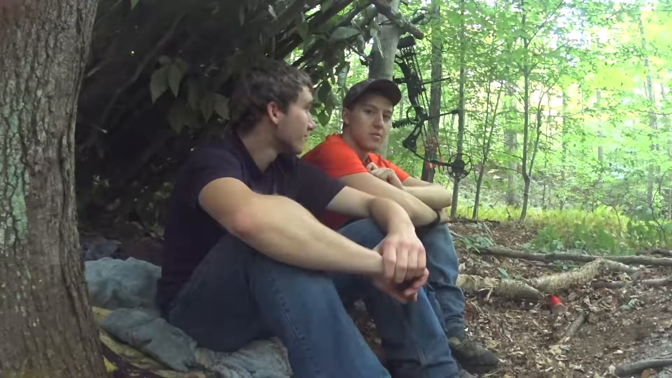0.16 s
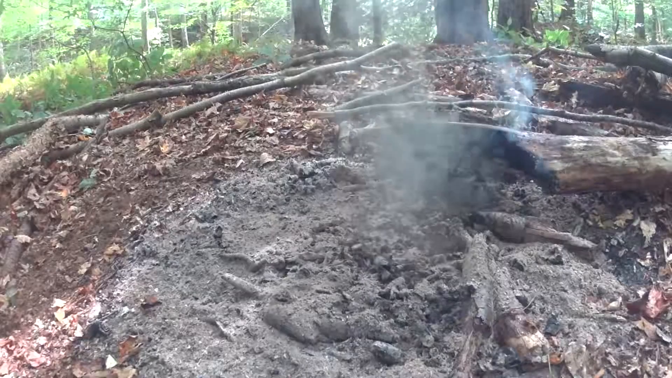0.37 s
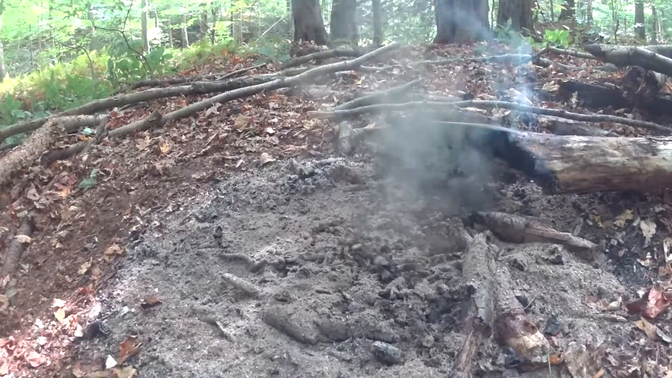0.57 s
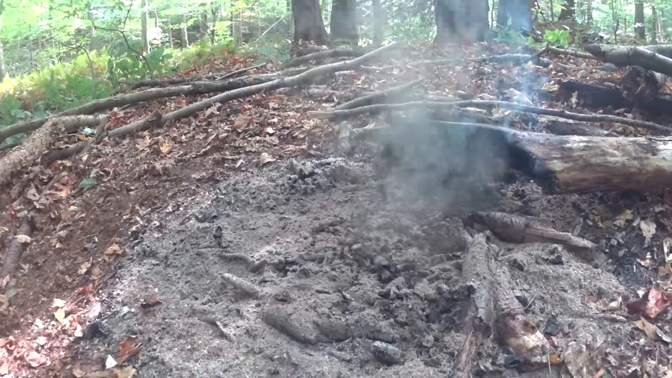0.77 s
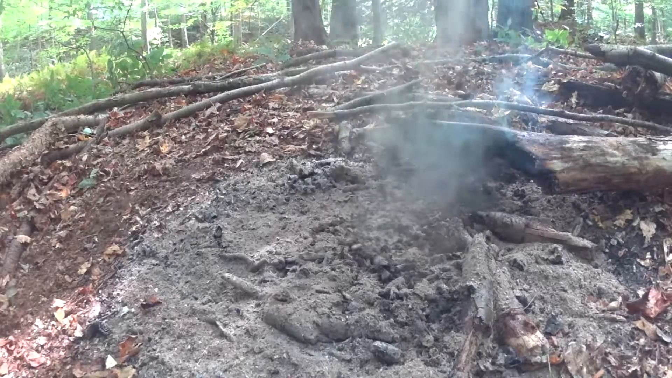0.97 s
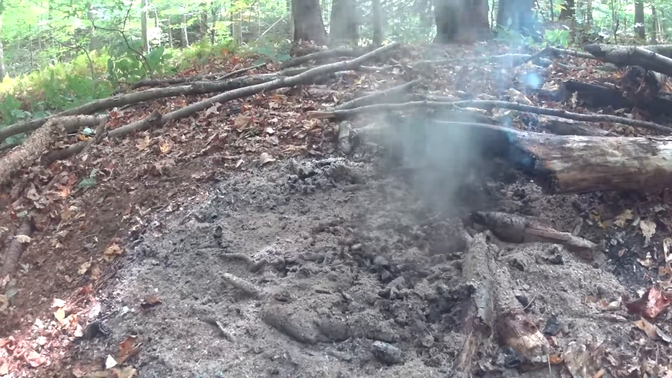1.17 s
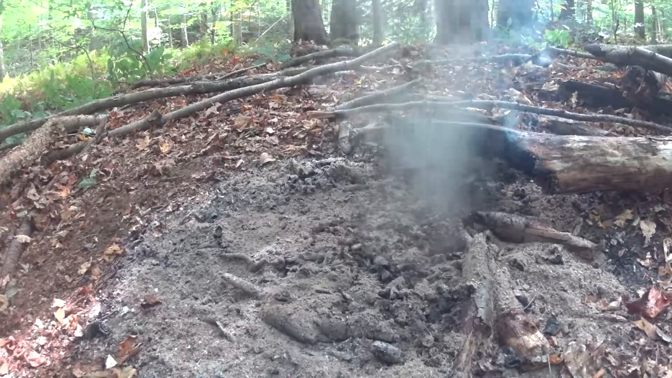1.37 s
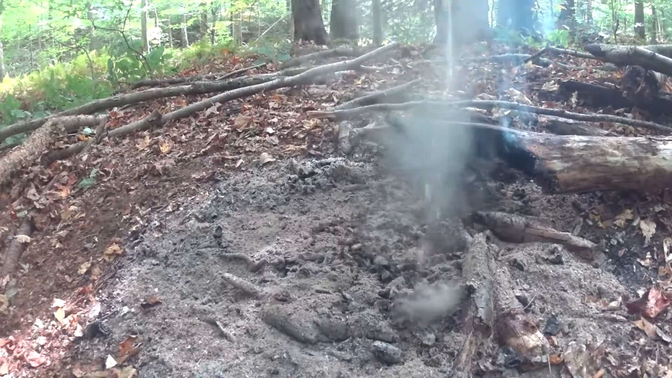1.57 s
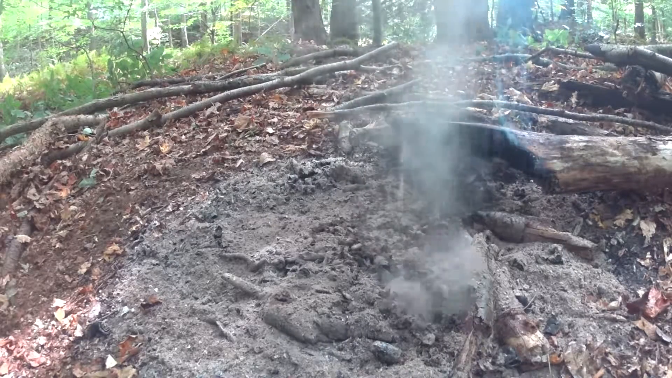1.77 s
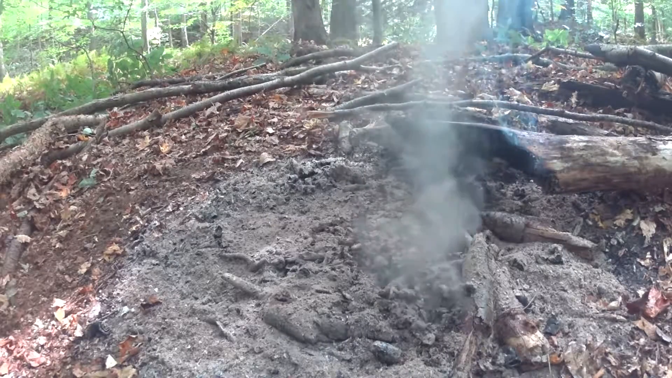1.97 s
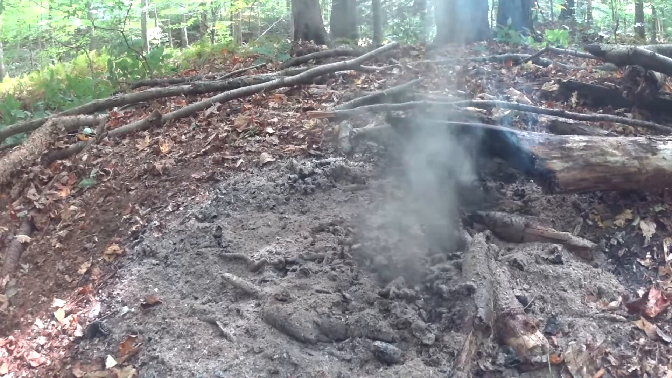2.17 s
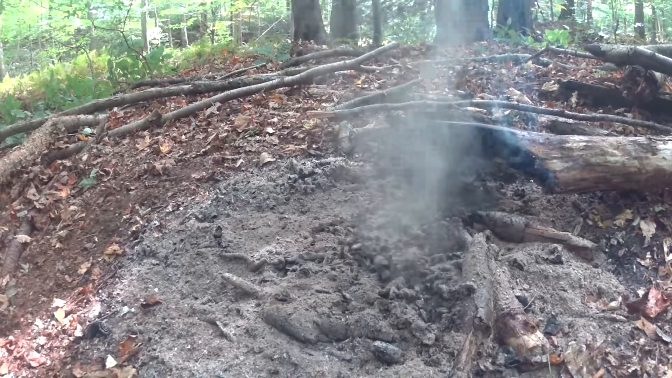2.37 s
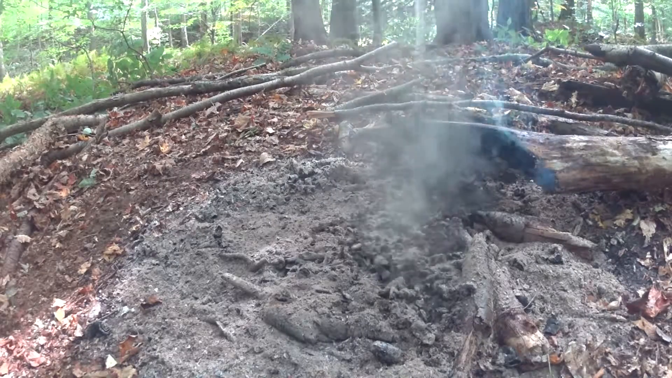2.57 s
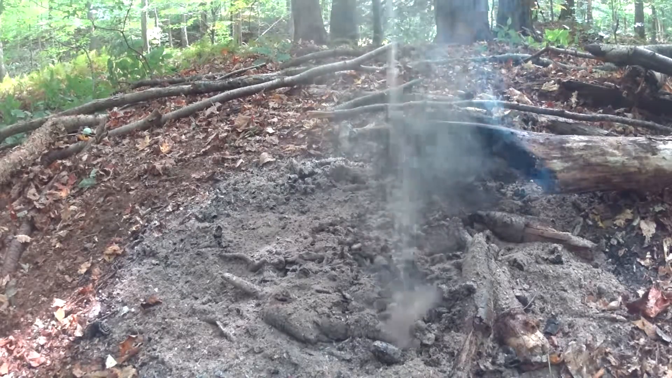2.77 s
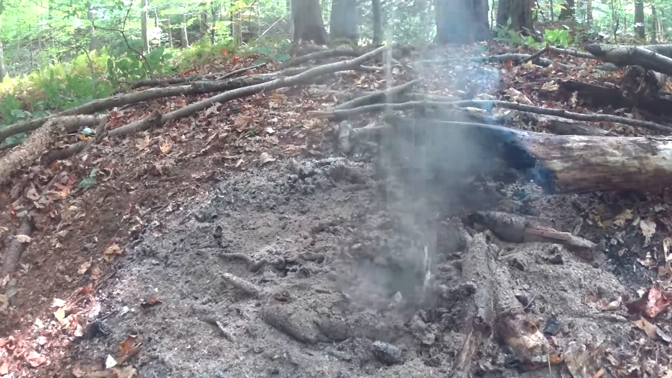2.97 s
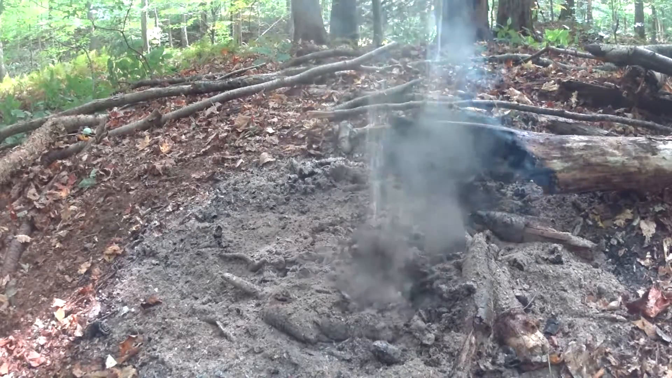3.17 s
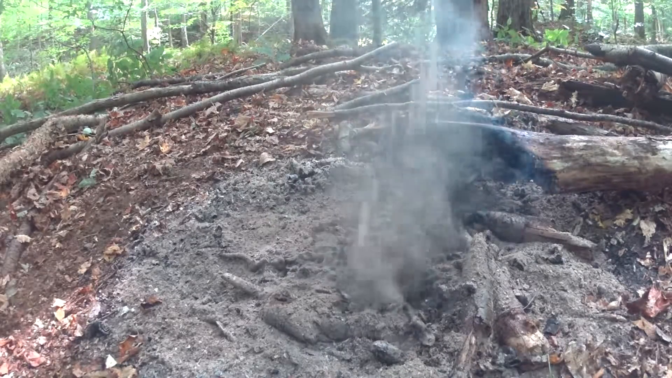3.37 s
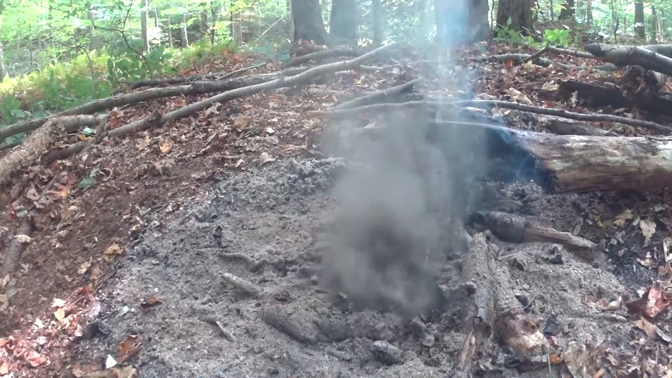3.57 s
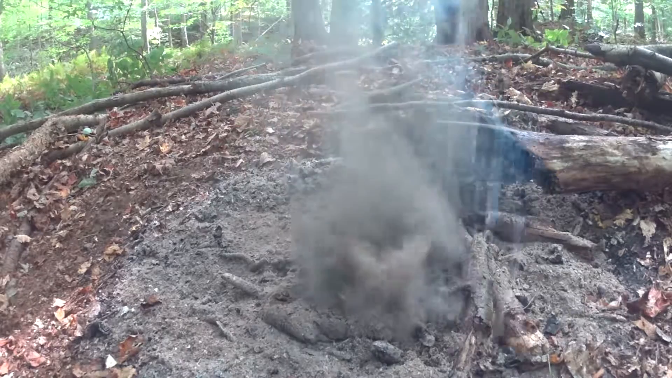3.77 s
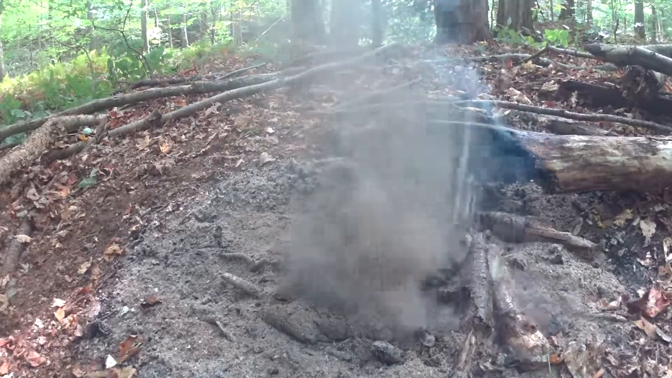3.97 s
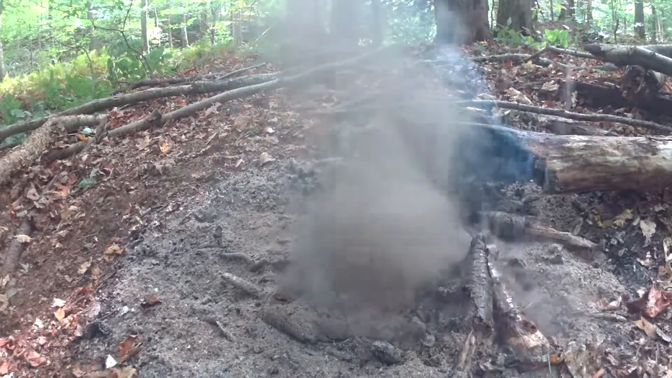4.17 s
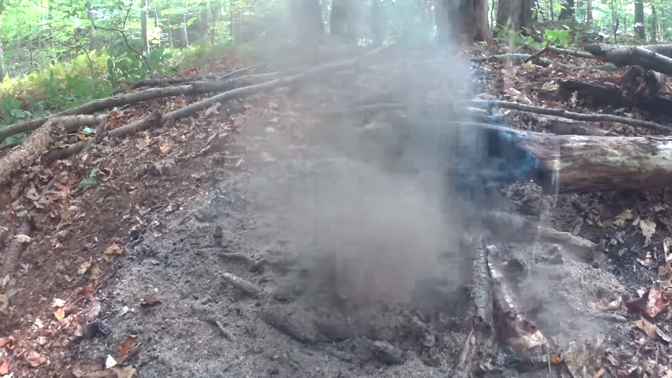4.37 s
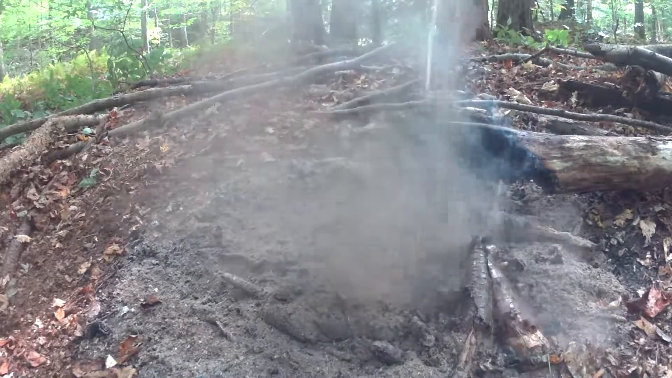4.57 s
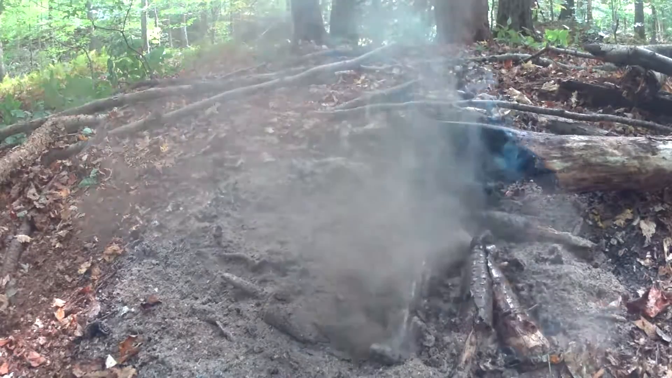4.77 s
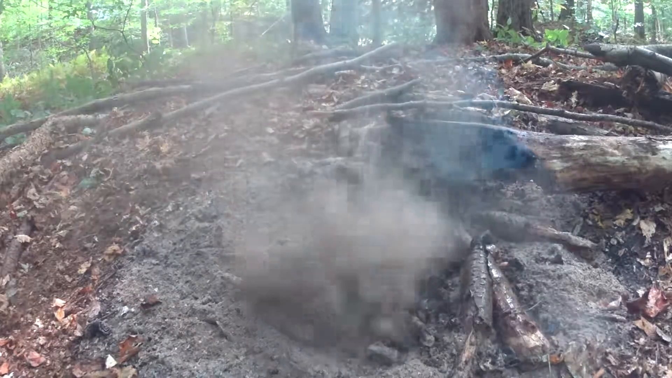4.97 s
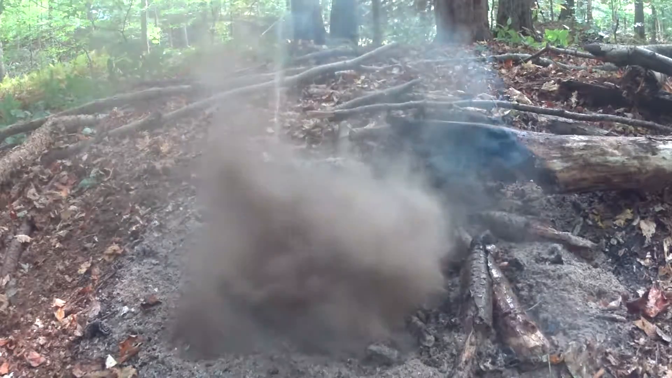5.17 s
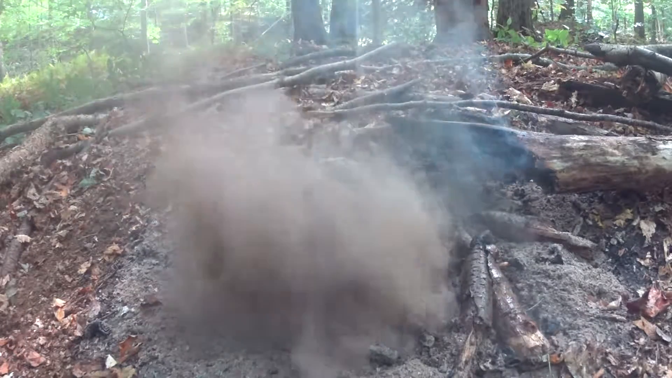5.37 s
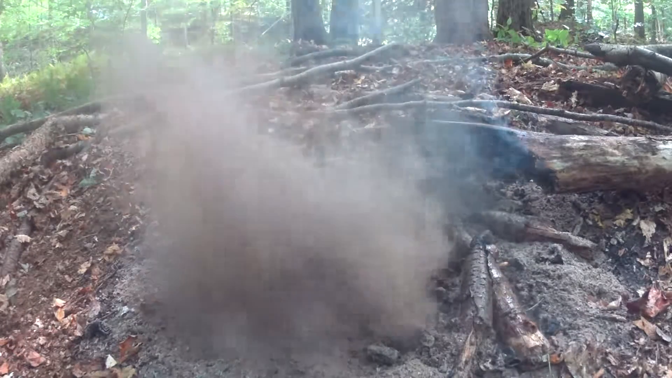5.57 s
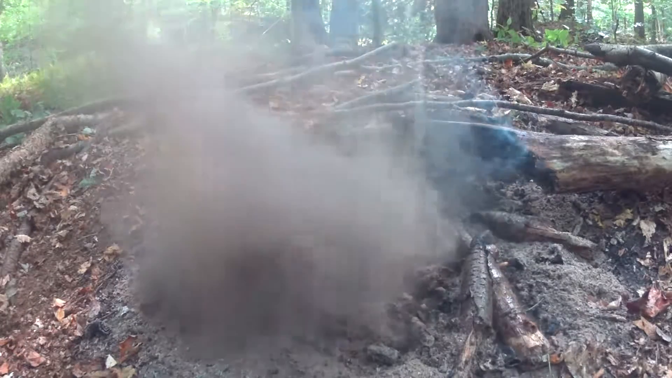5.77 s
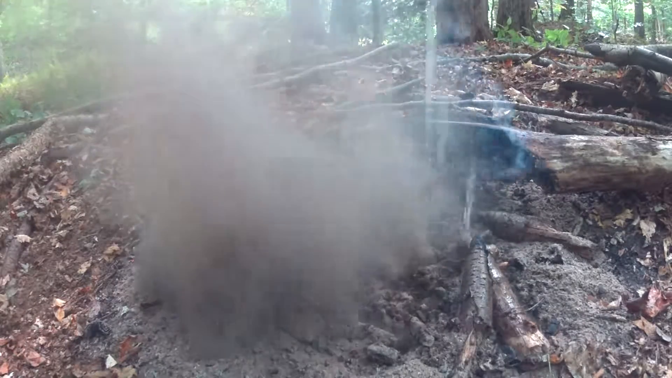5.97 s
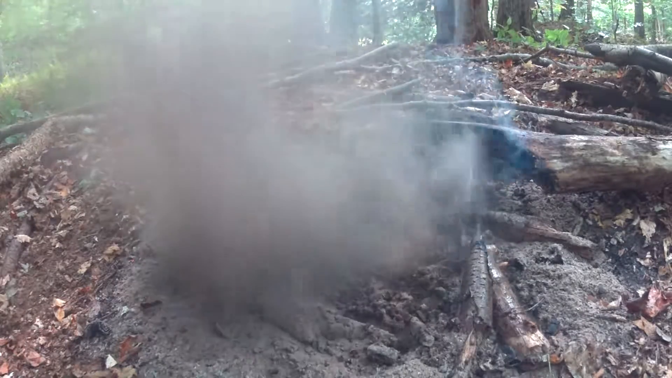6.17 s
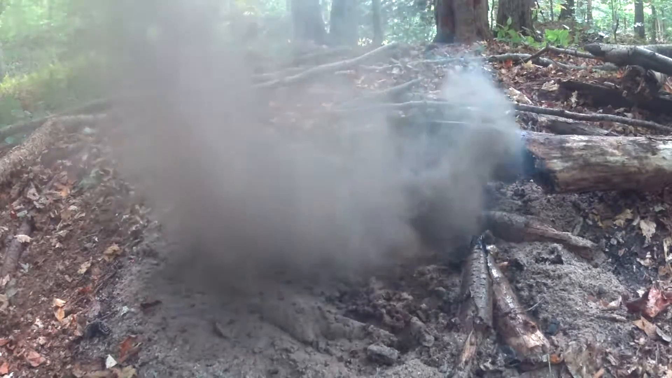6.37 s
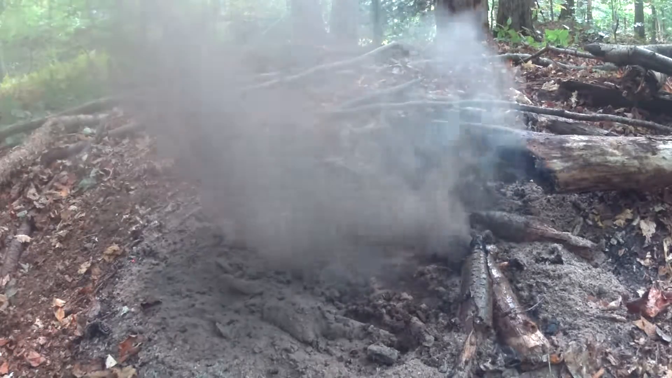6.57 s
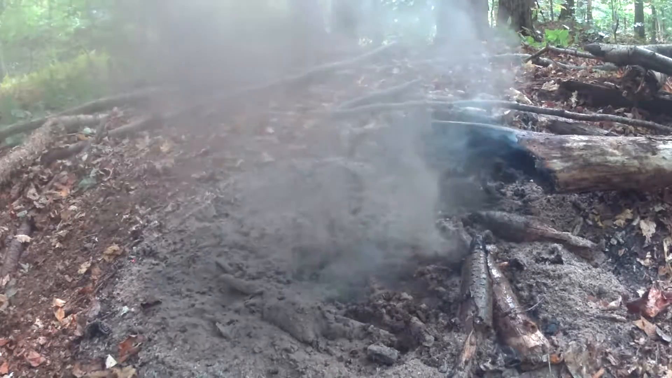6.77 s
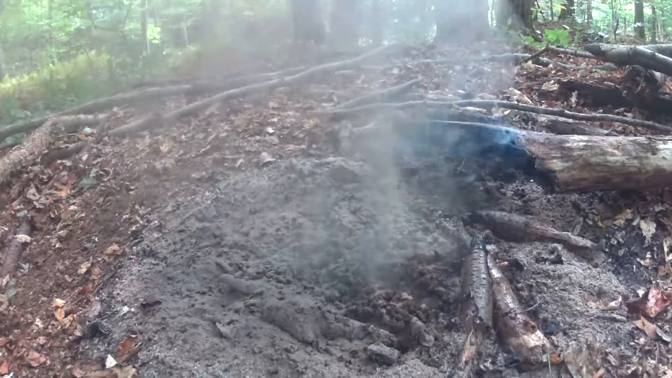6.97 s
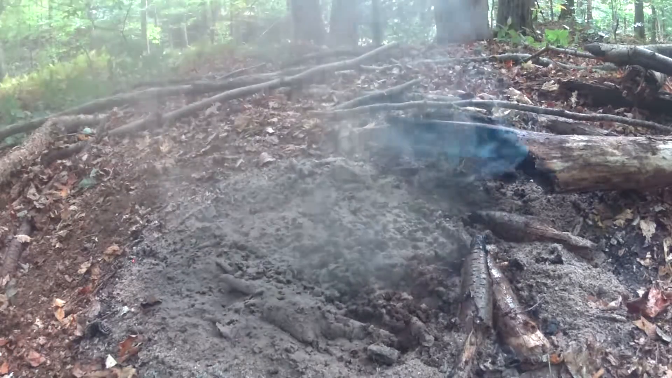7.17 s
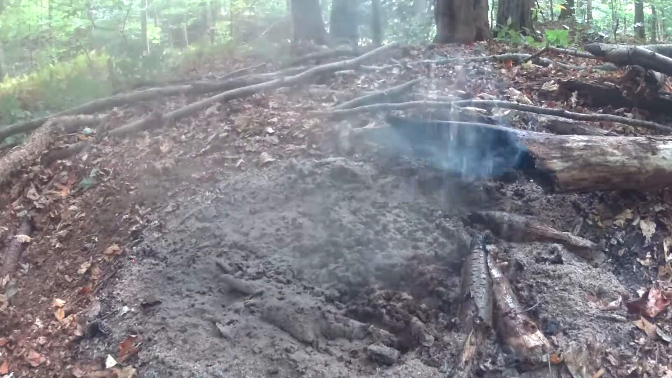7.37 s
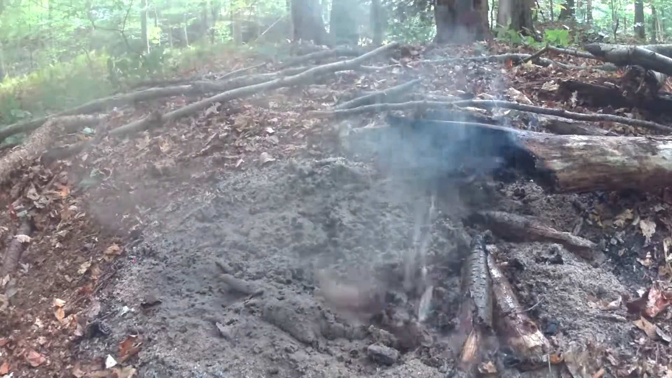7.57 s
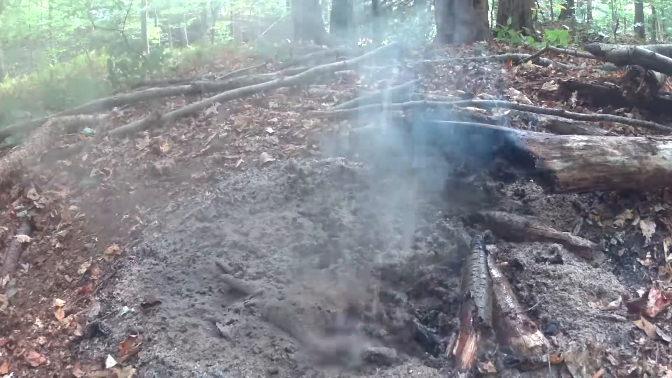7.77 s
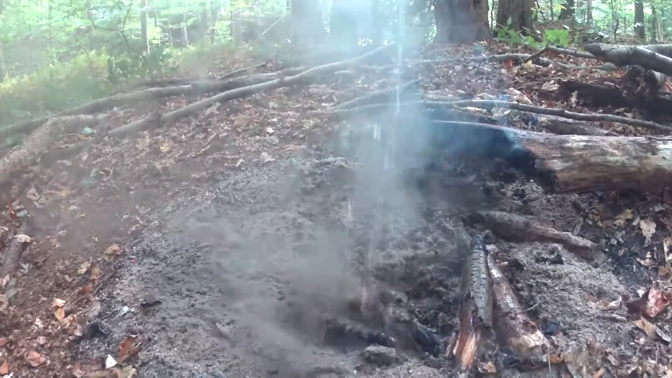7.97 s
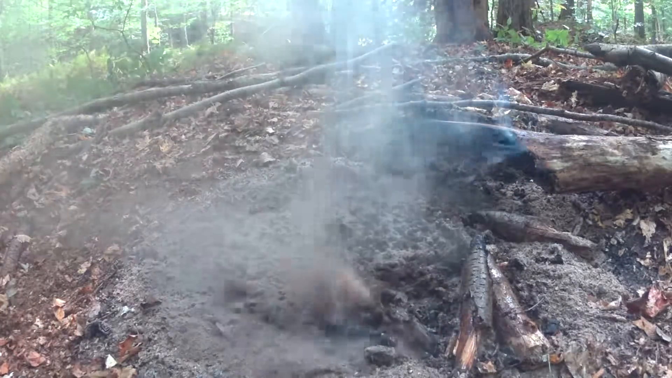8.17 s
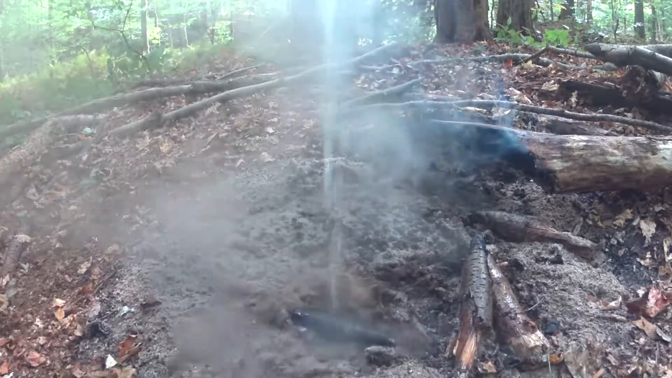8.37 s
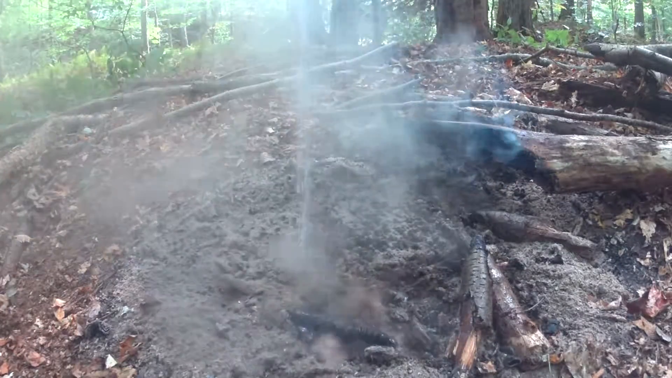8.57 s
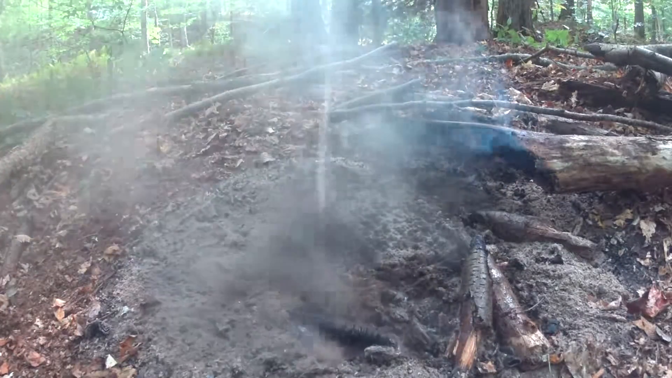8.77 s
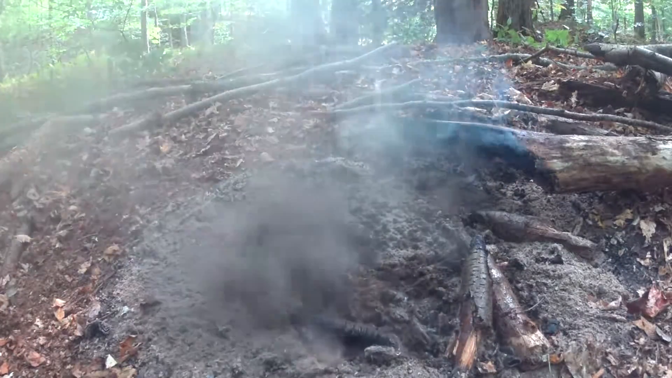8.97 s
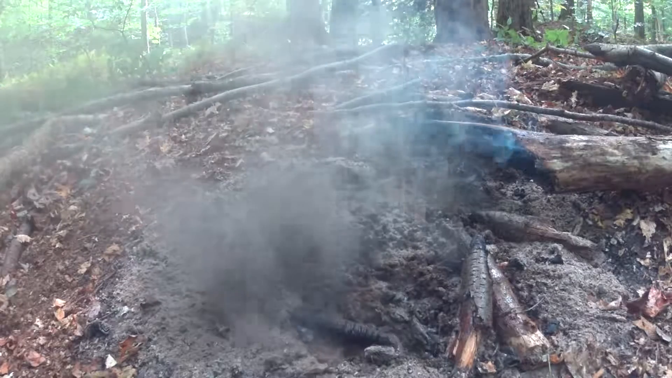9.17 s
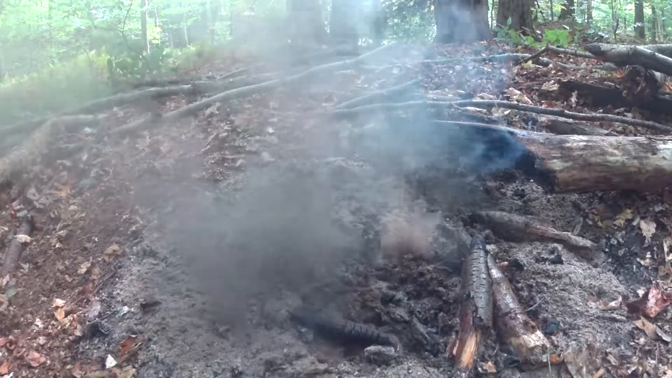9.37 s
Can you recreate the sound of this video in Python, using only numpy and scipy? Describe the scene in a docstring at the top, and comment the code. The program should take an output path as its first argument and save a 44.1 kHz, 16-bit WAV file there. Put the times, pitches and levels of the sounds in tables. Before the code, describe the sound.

Close up in a quiet wood, poured water sizzles and crackles on hot ash, surging, easing off, then surging again.

```python
"""A jug pours water in gulps onto hot embers in a wood, heard close up; leaves, air and a hum stay faint behind.
First the jug glugs low as air enters; from about 0.6 s single drops snap on the ash and a few short
gushes splatter, with more of them from 1.5 s, when water also thuds. From 2.7 to 6.2 s the pour is strong,
with steam hiss (flickering noise), snaps (short ticks) and popping wet pockets (fading tones).
After a quieter second a new gush starts near 7.4 s, swells past 8 s and weakens towards the end."""
import sys
import numpy as np
from scipy import signal
from scipy.io import wavfile
from scipy.ndimage import uniform_filter1d

SR = 44100
rng = np.random.default_rng(int(sys.argv[2]) if len(sys.argv) > 2 else 0)


def pcm_store(signal):
    """Save signal as 16-bit PCM."""
    levels = np.round(np.clip(np.atleast_2d(signal), -1, 1) * 32767)
    wavfile.write(sys.argv[1], SR, levels.astype(np.int16).T)


N = 416304  # length in samples

# How strong the pour is, between gushes:
# t/s, steam level/dB, steam treble level/dB, water level/dB, low rumble level/dB
POUR = [(0, -56, -67, -57.5, -61), (0.7, -57.5, -59, -59, -65), (0.95, -52.5, -57, -56.5, -62),
        (1.3, -58.5, -72, -63, -68), (1.47, -62.5, -66, -64.5, -68), (1.49, -48.5, -46, -43, -50),
        (1.75, -53, -45.5, -55.5, -55.5), (2.2, -58, -49.5, -61.5, -69), (2.645, -62, -65, -66.5, -67.5),
        (2.66, -45.5, -42.5, -54, -56), (3.2, -42.5, -50, -49.5, -53), (3.65, -39.5, -34, -43, -47),
        (4.15, -43, -36, -46, -48.5), (4.45, -46, -46, -48.5, -50), (4.7, -38.5, -26, -37, -44.5),
        (4.83, -41, -40, -49, -49), (5.05, -34.5, -29.5, -37, -44), (5.65, -47, -43, -47, -49.5),
        (6.2, -45, -41, -49, -53.5), (6.55, -50.5, -46, -59.5, -69.5), (7.38, -58.5, -63, -60, -66),
        (7.46, -45, -38.5, -51, -53.5), (7.7, -48.5, -43.5, -47, -49.5), (8.2, -36, -34, -45.5, -51),
        (8.5, -37.5, -32, -40, -48.5), (8.9, -42, -38, -46.5, -50.5), (9.44, -46, -40, -55.5, -64.5)]
# Tone colour of hissing steam: f/Hz, level/dB (per Hz)
STEAM_COLOUR = [(1120, -24.5), (1900, -0.5), (2020, -5.5), (3110, 2.5), (3450, -3.5), (3750, 0.5),
                (4900, -4), (6180, 1.5), (7010, -5), (8500, -7), (9310, 2.5), (9810, 5.5), (10600, 1.5),
                (11300, 2.5)]
# Tone colour of splashing water: f/Hz, level/dB (per Hz)
SPLASH_COLOUR = [(260, -35.5), (450, -4.5), (944, -10), (1070, -9.5), (1220, 4), (1510, -7), (1740, 0),
                 (1990, -20.5), (2100, -2.5), (2900, -9.5), (7000, -34)]
# Tone colour of the low rumble, with jug resonances near 92, 162 and 285 Hz: f/Hz, level/dB (per Hz)
RUMBLE_COLOUR = [(50, -19.5), (78, -15), (92, 3), (108, -7), (140, -10), (162, 0.5), (190, 0), (250, -5.5),
                 (285, -2), (330, -4.5), (460, -15), (700, -60.5)]


def gain_of(db):
    """Turn decibels into a factor for the sound pressure."""
    return 10 ** (np.asarray(db) / 20)


def evened(x):
    """Bring a sound to an rms of 1, so that a level can be set afterwards."""
    return x / np.sqrt(np.mean(x ** 2) + 1e-20)


def read(points, hz):
    """Read a curve at any pitch, in straight lines over log frequency."""
    f, value = np.transpose(points)
    return np.interp(np.log(hz + 1), np.log(f + 1), value)


def add(mix, s, sound):
    """Lay a short sound into the mix at s seconds."""
    part = mix[round(s * SR):][:len(sound)]
    part += sound[:len(part)]


def control(table, column):
    """Read one column of a time curve at every sample."""
    columns = np.transpose(table)
    return np.interp(np.arange(N) / SR, columns[0], columns[column])


def highpass(x, order, hz):
    """Weaken everything below hz."""
    return signal.sosfilt(signal.butter(order, hz, "high", fs=SR, output="sos"), x)


def colour(x, points):
    """Filter that never rings ahead of the sound; white noise of rms 1 stays near rms 1."""
    hz = abs(np.fft.fftfreq(8192, 1 / SR))
    log_gain = np.log(gain_of(np.maximum(read(points, hz), -100)))
    # the Hilbert transform gives the phase that puts the energy as early as possible
    spectrum = np.exp(np.conj(signal.hilbert(log_gain)))
    taps = np.fft.ifft(spectrum).real[:4096]
    return signal.oaconvolve(x, taps / np.linalg.norm(taps))[:len(x)]


def patchy(patchy_db, flicker_db, span, depth=np.ones(N)):
    """White noise with random patches in time and pitch and a flicker shared by all pitches."""
    frames = N // 64 + 5  # one frame every 64 samples; span counts frames
    a, b, patches = rng.standard_normal((frames, 129, 3)).T
    patches = uniform_filter1d(patches, 8, 0)  # smooth over pitch
    patches = evened(uniform_filter1d(patches, span, 1))  # smooth over time
    flicker = evened(uniform_filter1d(rng.standard_normal(frames), span))
    level_db = np.resize(depth[::64], frames) * (patchy_db * patches + flicker_db * flicker)
    z = (a + 1j * b) * gain_of(level_db)
    return evened(signal.istft(z, nperseg=256, noverlap=192)[1][:N])


def grains(per_s, spread_db, low_hz, high_hz, turns, count=8):
    """Sparse short wavelets of many pitches that fade over a few turns or less; a few are large."""
    happens = rng.random(N) < per_s / SR
    size = gain_of(spread_db * np.minimum(rng.exponential(1, N), 4)) * happens
    kind = rng.integers(0, count, N)
    out = np.zeros(N)
    for k, hz in enumerate(np.geomspace(low_hz, high_hz, count)):
        u = np.arange(400) / SR * hz  # time counted in turns of the tone
        wavelet = np.sin(2 * np.pi * u) * np.exp(-u / turns) * (1 - np.exp(-u / 0.71))
        wavelet = wavelet / np.linalg.norm(wavelet) * np.sqrt(hz)
        out += signal.oaconvolve(size * (kind == k), wavelet)[:N]
    return evened(out)


def bubbles(table, rise_s, echo_s, echo_db, slap_db, slap_hz):
    """Ringing air pockets with a soft start, a dull slap of water and one echo off the ground."""
    out, t = np.zeros(N), np.arange(9000) / SR
    slaps = rng.standard_normal((len(table), 9000))
    slaps = evened(signal.lfilter(*signal.butter(2, slap_hz, fs=SR), slaps))
    for (s, db, hz, t60), slap in zip(table, slaps):
        ring = np.sin(2 * np.pi * hz * t) * (1 - np.exp(-t / rise_s))
        ring += slap * gain_of(slap_db - 60 * t / 0.094)  # the slap fades faster than the tone
        ring *= gain_of(db - 60 * t / t60)
        add(out, s, ring)
        add(out, s + echo_s, gain_of(echo_db) * ring)
    return out


def steam():
    """A fine hiss; sputter and flicker grow with the steam level, and the treble has its own level."""
    level_db = control(POUR, column=1)
    fierce = np.clip((level_db + 61.0) / 16, .1, 1)
    sputter = patchy(4.5, 5.0, span=4)
    hiss = patchy(1.9, 1.63, span=40, depth=fierce) + fierce * gain_of(-5.0) * sputter
    spits = grains(1500, 6.7, 1450, 10500, turns=0.18)
    hiss = colour(hiss + fierce * gain_of(-9.5) * spits, STEAM_COLOUR)
    dull = signal.sosfiltfilt(signal.butter(2, 7500, fs=SR, output="sos"), hiss)
    treble = hiss - dull
    return gain_of(level_db) * evened(dull) + gain_of(control(POUR, column=2)) * evened(treble)


def splash():
    """Water churns in the ash: lumpy noise and small bubbles."""
    lumps = patchy(3.05, 0.22, span=10)
    small_bubbles = grains(250, 0.75, 488, 2250, turns=3.0)
    churn = colour(lumps + gain_of(-26.0) * small_bubbles, SPLASH_COLOUR)
    return gain_of(control(POUR, column=3)) * evened(churn)


def rumble():
    """A low uneven rumble with resonances of the jug near 92, 162 and 285 Hz."""
    low_noise = colour(patchy(1.2, 2.2, span=24), RUMBLE_COLOUR)
    return gain_of(control(POUR, column=4)) * evened(low_noise)


def gushes():
    """Dense sputter under a quick swell; dull gushes sound deeper with some rumble, others fizz."""
    # Gushes that splatter over the embers: t/s, level/dB, length/s, dullness/0-1
    gush_rows = [(0.57, -35.5, 0.064, 0.21), (1.117, -45, 0.024, 0.2), (1.139, -36, 0.07, 0.29),
                 (1.47, -45.5, 0.034, 0.1), (1.658, -39.5, 0.023, 0), (1.773, -33, 0.06, 0.43),
                 (1.97, -50, 0.064, 0.14), (2.654, -40, 0.064, 0.55), (2.804, -34.5, 0.047, 0.2),
                 (2.905, -36, 0.061, 0.25), (3.026, -28, 0.035, 0.41), (3.257, -29.5, 0.012, 0.02),
                 (3.335, -27.5, 0.033, 0.31), (3.393, -28.5, 0.043, 0.74), (3.505, -26, 0.057, 0.19),
                 (3.428, -33, 0.06, 0.08), (3.654, -31, 0.02, 0.23), (3.685, -31.5, 0.051, 0.17),
                 (3.861, -33, 0.03, 0.7), (4.279, -24, 0.013, 0), (4.333, -31, 0.049, 0.6),
                 (4.476, -30.5, 0.065, 0.37), (4.588, -34, 0.061, 0), (4.64, -27.5, 0.06, 0.31),
                 (4.862, -25, 0.073, 0.4), (5.371, -31, 0.05, 0.64), (5.524, -24, 0.051, 0.74),
                 (5.709, -31.5, 0.036, 0.72), (5.754, -28, 0.054, 0.42), (6.06, -36.5, 0.068, 0.34),
                 (6.252, -32.5, 0.039, 0.26), (7.473, -25.5, 0.052, 0.25), (7.605, -33.5, 0.039, 0),
                 (7.715, -31, 0.075, 0.19), (7.837, -30, 0.0077, 0), (7.891, -27.5, 0.09, 0.16),
                 (8.12, -28, 0.043, 0.08), (8.389, -27, 0.046, 0.2), (8.582, -32.5, 0.078, 0.9),
                 (8.96, -30.5, 0.029, 0.67), (9.257, -33.5, 0.063, 0.53)]
    spurts_per_s, spurt_s, between_spurts_db = 200, .003, -1  # a gush spits in short spurts
    boom_db, hiss_db = -14, 0.5  # low rumble and hiss under a gush
    rise = 0.07  # as a share of the length

    deep = evened(colour(patchy(0.38, 2.1, span=3), SPLASH_COLOUR))
    deep += gain_of(boom_db) * evened(colour(rng.standard_normal(N), RUMBLE_COLOUR))
    fizz = evened(colour(grains(6000, 5.8, 1690, 7000, turns=0.58), STEAM_COLOUR))
    fizz = evened(fizz + gain_of(hiss_db) * colour(rng.standard_normal(N), STEAM_COLOUR))

    starts = rng.random(N) * (rng.random(N) < spurts_per_s / SR)
    spurts = evened(signal.lfilter([1], [1, -np.exp(-1 / (spurt_s * SR))], starts))
    spurts += gain_of(between_spurts_db)
    deep, fizz = evened(deep * np.sqrt(spurts)), evened(fizz * spurts)

    out = np.zeros(N)
    for s, db, length, dull in gush_rows:
        at = round(s * SR) + np.arange(round(2 * length * SR))
        u = np.linspace(0, 2, len(at))  # time counted in lengths
        swell = (1 - np.exp(-u / rise)) / (1 + u ** 6)
        add(out, s, gain_of(db) * swell * (dull * deep[at] + (1 - dull) * fizz[at]))
    return out


def snaps():
    """Drops snap on hot ash: a sharp tick with a short ring, then a small puff of steam."""
    # The loudest snaps: t/s, level/dB (before the filters below), f/Hz (centre)
    loud_rows = [(0.584, -10, 2980), (0.849, -26, 5500), (1.1781, -16, 2900), (1.756, -19, 6730),
                 (1.786, -23, 3020), (1.8603, -19.5, 6500), (2.3785, -27.5, 6440), (3.018, -9, 3650),
                 (3.042, -17, 2490), (3.0874, -10.5, 6040), (3.1021, -9, 2880), (3.146, -6.5, 4750),
                 (3.1645, -10, 3400), (3.179, -11, 2830), (3.1953, -6, 3870), (3.207, -20, 9800),
                 (3.301, -7.5, 4740), (3.321, -8, 6400), (3.3932, -16, 2420), (3.4355, -4.5, 4520),
                 (3.443, -12.5, 10300), (3.474, -8, 4070), (3.487, -9, 10100), (3.6564, -8, 9400),
                 (3.689, -5, 3060), (3.707, -10, 3000), (3.797, -10, 5100), (3.9705, -5.5, 4380),
                 (4.3692, -4.5, 4100), (4.4329, -7, 9400), (4.4377, -7.5, 6300), (4.576, -13, 9790),
                 (4.595, -8.5, 10300), (4.775, -5.5, 6400), (4.8212, -6.5, 6200), (5.181, -10, 6300),
                 (5.5982, -14.5, 4050), (5.9714, -16, 4250), (5.9865, -14, 2690), (6.116, -11.5, 4060),
                 (6.2247, -11, 10000), (6.2382, -10.5, 9100), (6.847, -27, 6300), (6.8658, -22, 6500),
                 (6.9152, -23, 4070), (7.1934, -23.5, 3870), (7.244, -26, 6300), (7.3195, -23.5, 3700),
                 (7.4393, -8, 11800), (7.4802, -8, 4620), (7.5023, -10, 5550), (7.605, -8, 5340),
                 (7.6224, -7.5, 4870), (7.7144, -15, 10040), (7.728, -10, 3380), (7.8098, -10.5, 5550),
                 (7.8324, -8, 3600), (7.852, -13, 6530), (7.8718, -6.5, 9900), (7.9146, -3.5, 4450),
                 (7.923, -7, 4400), (7.938, -11, 3500), (7.972, -7, 5840), (8.008, -14, 6040),
                 (8.0157, -7, 9900), (8.0584, -5, 3840), (8.1604, -6.5, 10100), (8.19, -8.5, 5650),
                 (8.2651, -10.5, 9800), (8.295, -6, 9440), (8.3197, -4, 2820), (8.331, -4, 2840),
                 (8.346, -5, 3480), (8.389, -6, 3200), (8.81, -14, 2920), (8.9228, -10.5, 5160),
                 (8.9394, -14, 4610), (8.9595, -20, 2010), (9.084, -12.5, 3020), (9.1564, -8, 2610),
                 (9.204, -16, 6290), (9.235, -14.5, 2160)]
    rows = list(loud_rows) + crackle()
    out, t = np.zeros(N), np.arange(800) / SR
    for s, db, hz in rows:
        noise = rng.standard_normal(len(t))
        tick = np.sin(2 * np.pi * hz * t) + 0.83 * noise
        tick *= gain_of(-60 * t / 0.0048) * (1 - np.exp(-t / 0.00013))
        puff = noise * gain_of(-15.5) * np.e * t / 0.0033 * np.exp(-t / 0.0017)
        add(out, s, gain_of(db) * (tick + puff))
    return colour(out, STEAM_COLOUR) * 0.37 + highpass(out, 3, 1800) * 0.19


def crackle():
    """Random small snaps that follow the steam level, as rows like those of the loud ones."""
    per_s, over_steam_db, spread_db = 190, 8.5, 3
    simmer_db = -45  # below this steam level the snaps fall two dB for each dB of steam
    when, size, pitch = rng.random((2000, 3)).T
    s = np.cumsum(-np.log(1 - when)) / per_s  # random waits between snaps
    steam_db = np.interp(s, *np.transpose(POUR)[:2])
    db = steam_db + np.minimum(steam_db - simmer_db, 0) + over_steam_db
    db -= spread_db * np.log(np.maximum(size, .05))  # a few are much louder
    hz = 2500 * 4.0 ** pitch
    return [row for row in zip(s, db, hz) if row[0] < N / SR]


def pops():
    """Wet pockets pop: short rings of small air spaces, which have no bass."""
    # t/s, level/dB, f/Hz
    pop_rows = [(3.408, -26, 1500), (3.86, -23, 880), (3.862, -16, 1875), (4.0241, -11.5, 1135),
                (4.043, -16.5, 1262), (4.171, -28, 1300), (4.345, -23.5, 1320), (4.366, -26, 1940),
                (4.504, -23.5, 1906), (4.54, -26, 1300), (4.565, -25, 1060), (4.567, -26, 1730),
                (4.59, -19, 1240), (4.602, -23, 1180), (4.671, -10, 993), (4.796, -26.5, 1250),
                (4.907, -19.5, 1260), (5.186, -20, 1753), (5.534, -22, 1200), (6.31, -29, 1330),
                (7.132, -42.5, 1285), (7.744, -29, 1490), (8.504, -28, 1220), (8.615, -24, 1160),
                (8.938, -26.5, 1290)]
    rows = [(s, db, hz, .035) for s, db, hz in pop_rows]  # each fades by 60 dB in 0.035 s
    popping = bubbles(rows, rise_s=0.00065, echo_s=0.0077, echo_db=-5.5, slap_db=-8.5, slap_hz=1400)
    return highpass(popping, 2, 500)


def thuds():
    """Slugs of water hit the ash: very short low rings with a strong slap."""
    # t/s, level/dB, f/Hz
    thud_rows = [(1.783, -30, 576), (3.39, -27, 427), (5.27, -21.5, 444), (5.519, -32, 554),
                 (5.557, -16.5, 368), (5.781, -15, 423), (8.518, -24.5, 450), (8.578, -13.5, 427),
                 (8.939, -23.5, 500), (8.959, -18.5, 483), (9.277, -35, 338)]
    rows = [(s, db, hz, .016) for s, db, hz in thud_rows]  # each fades by 60 dB in 0.016 s
    return bubbles(rows, rise_s=0.0004, echo_s=.004, echo_db=-12, slap_db=-6, slap_hz=1800)


def glugs():
    """The jug gulps air: low rings with a soft start."""
    # t/s, level/dB, f/Hz, time to fade by 60 dB/s
    glug_rows = [(0.311, -37, 103, 0.076), (0.341, -43, 96, 0.26), (0.608, -21.5, 242, 0.045),
                 (0.641, -28, 168, 0.18), (0.645, -27, 287, 0.054), (0.775, -37.5, 171, 0.13),
                 (0.855, -47.5, 146, 0.16), (3.865, -30.5, 170, 0.16), (4.024, -14.5, 289, 0.077),
                 (4.602, -21, 288, 0.1), (5.265, -36.5, 165, 0.18), (6.311, -44.5, 287, 0.13),
                 (7.409, -32, 198, 0.068), (8.592, -24.5, 304, 0.15), (8.641, -16, 330, 0.088)]
    return bubbles(glug_rows, rise_s=0.0056, echo_s=0.00755, echo_db=-1.5, slap_db=-15.5, slap_hz=404)


def single_tones():
    """Assorted single tones, from one low ring to high pings, some very short, with little slap."""
    # t/s, level/dB, f/Hz, time to fade by 60 dB/s
    tone_rows = [(.615, -34.5, 965, 0.13), (.63, -36, 94, 0.29), (7.14, -44, 2260, 0.091),
                 (7.322, -40, 4200, 0.047), (7.664, -16.5, 1300, 0.012)]
    return bubbles(tone_rows, rise_s=0.0025, echo_s=.0075, echo_db=1.0, slap_db=-21, slap_hz=2500)


def wood():
    """Distant leaves and air as soft coloured noise, with a faint low hum of steady tones."""
    # Tone colour of leaves and air: f/Hz, level/dB (per Hz)
    air_colour = [(15, -28), (25, -17), (60, 16), (250, -5.5), (732, -2), (1050, 6.5), (1220, -12),
                  (1580, -9), (2910, 1), (6270, -12), (7320, -4), (9940, -21), (11300, -28)]
    # Tones of the hum: f/Hz, level/dB (rms)
    hum_tones = [(60, -75), (118.4, -76)]
    t = np.arange(N) / SR
    hum = sum(np.sqrt(2) * gain_of(db) * np.sin(2 * np.pi * hz * t) for hz, db in hum_tones)
    air = colour(patchy(.8, .4, span=40), air_colour)
    return gain_of(-66) * air + hum


def ports(x):
    """Two close microphone ports hear the scene with unlike level and phase, plus a part of their own."""
    # Left louder than right: f/Hz, level/dB
    left_over_right = [(60, -3), (300, 0), (600, -3.5), (900, 2), (1200, -4.5), (1750, 5), (2000, 3),
                       (2800, 6), (3200, 19), (3550, 8), (4250, 14), (5000, 5), (5600, .5), (6000, 2.5),
                       (7800, -2), (9000, .5)]
    # Left ahead of right: f/Hz, phase/rad
    left_ahead = [(780, 0.2), (1550, -1.3), (2070, -2.2), (3100, -1.1), (3360, -2.5), (3700, -1.7),
                  (4820, -2.7), (5770, -2.0), (7580, -1.5), (8440, -0.9), (10900, -0.7)]
    # The part that differs at random between the ports: f/Hz, level/dB
    unshared_part = [(30, -8), (100, -8), (300, -15), (650, -1), (1150, -7), (2000, -3), (4000, -3),
                     (6300, -3), (8400, 0), (9400, -6), (11000, -5)]
    hz, _, z = signal.stft(x, SR, nperseg=512)
    # each port takes half of the difference
    left = gain_of(read(left_over_right, hz) / 2) * np.exp(.5j * read(left_ahead, hz))
    pair = np.array([left, 1 / left])[..., None]
    pair /= abs(pair.mean(0))  # the mean of both ports keeps its level
    # random phases make the two channels differ
    unshared = np.exp(2j * np.pi * rng.random((2, len(hz), z.shape[1])))
    unshared *= gain_of(read(unshared_part, hz))[:, None]
    return signal.istft(z * (pair + unshared), SR, nperseg=512)[1][:, :N]


def scene():
    """Sum the water and fire sounds, take off their deep bass, add the wood and hear it in stereo."""
    fire = steam() + splash() + rumble() + gushes() + snaps()
    fire += pops() + thuds() + glugs() + single_tones()
    fire = highpass(fire, 3, 72)  # the microphone takes up little deep bass from these sounds
    return ports(fire + wood())


def record(dry):
    """The sharpest peaks round off in the input stage; then the treble is cut off."""
    ceiling = .8
    soft = ceiling * np.tanh(dry / ceiling)
    lowpass = signal.firwin(301, 11080, window=("kaiser", 7), fs=SR)  # edge in Hz
    return signal.oaconvolve(soft, lowpass[None], "same")


dry = scene()
out = record(dry)
pcm_store(out)
```